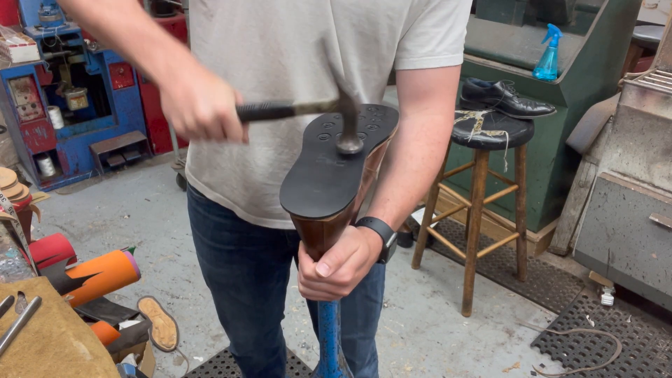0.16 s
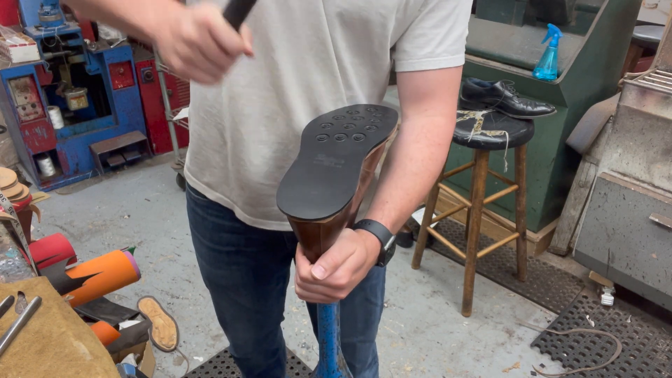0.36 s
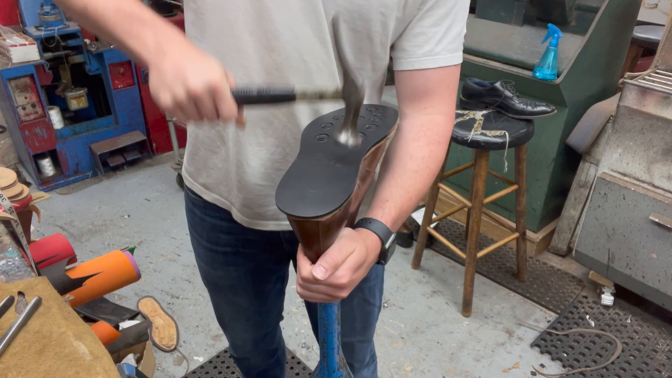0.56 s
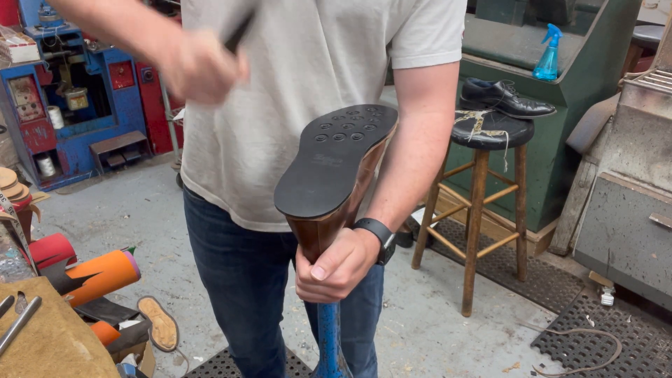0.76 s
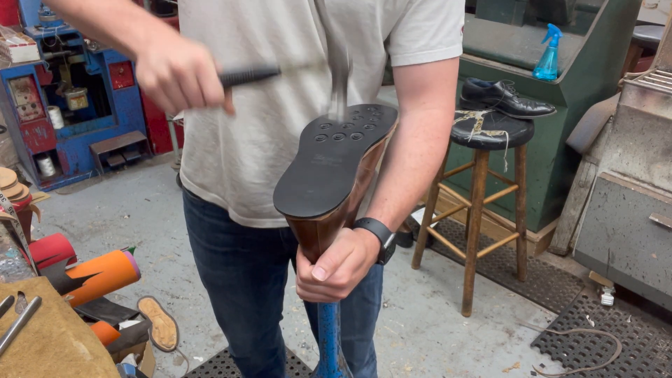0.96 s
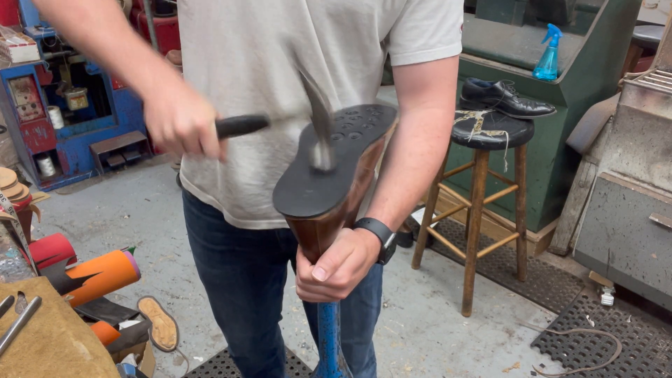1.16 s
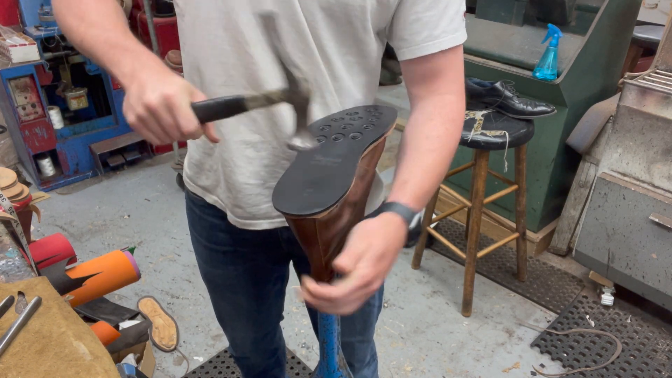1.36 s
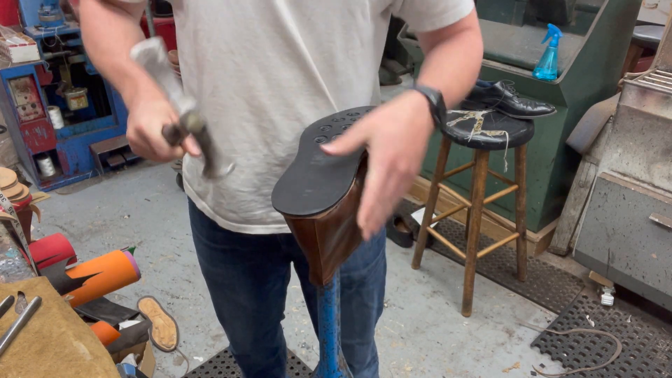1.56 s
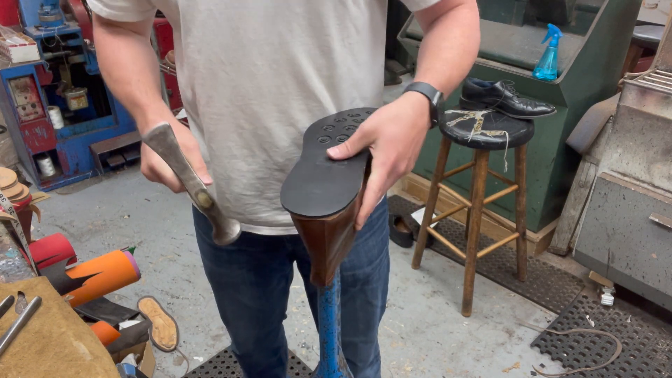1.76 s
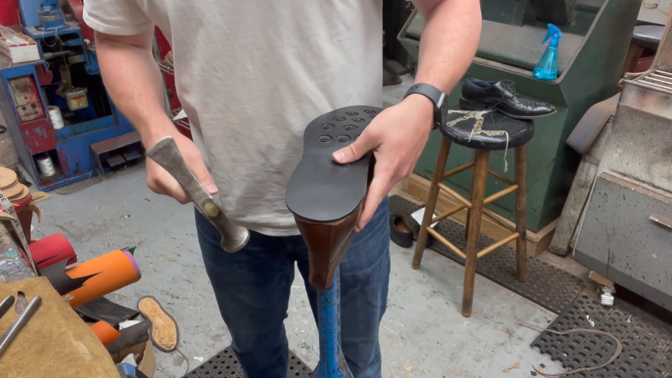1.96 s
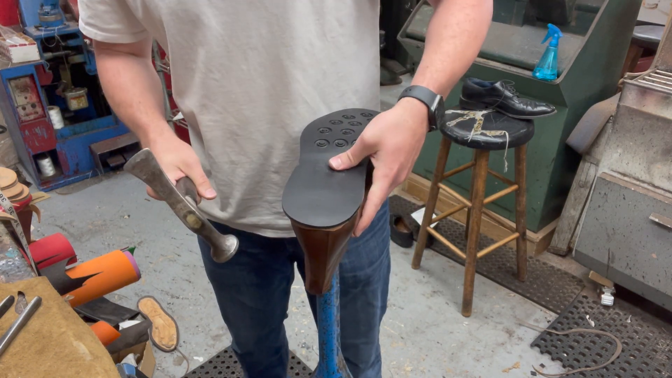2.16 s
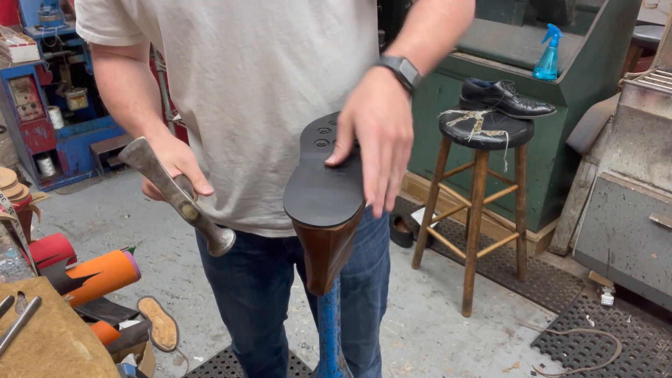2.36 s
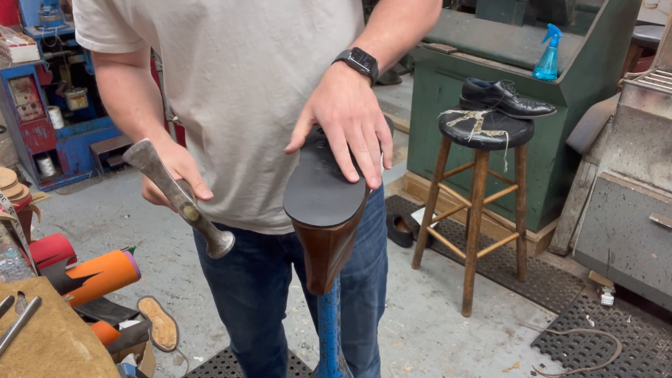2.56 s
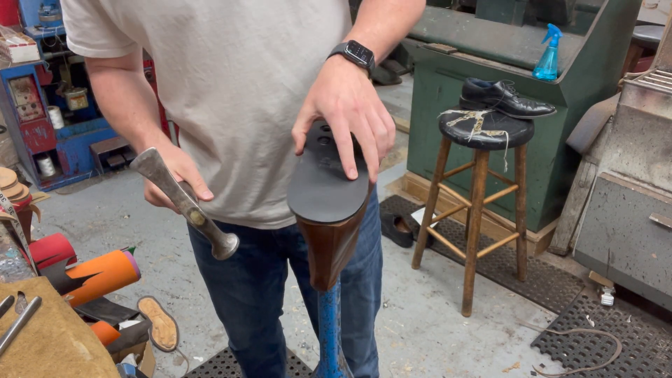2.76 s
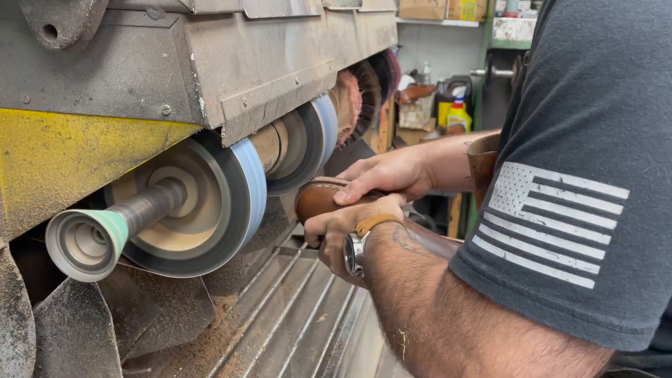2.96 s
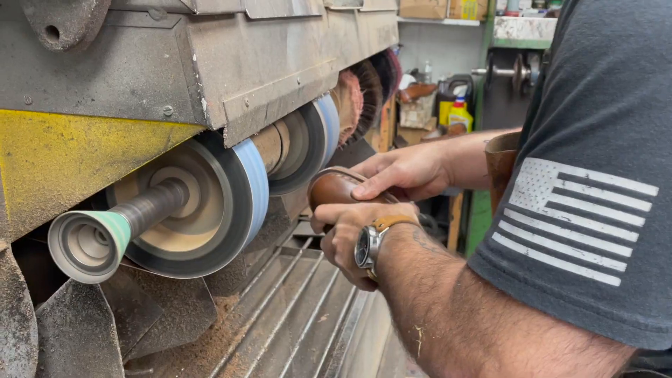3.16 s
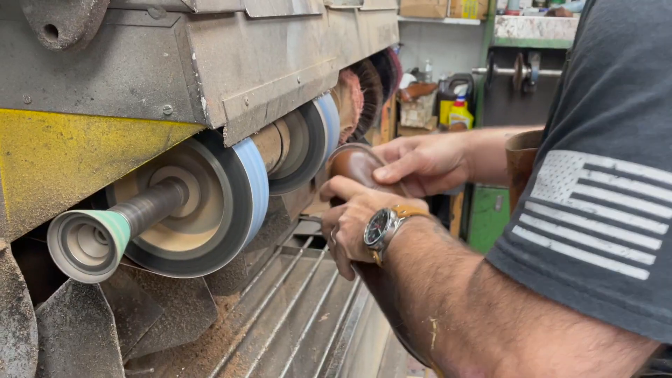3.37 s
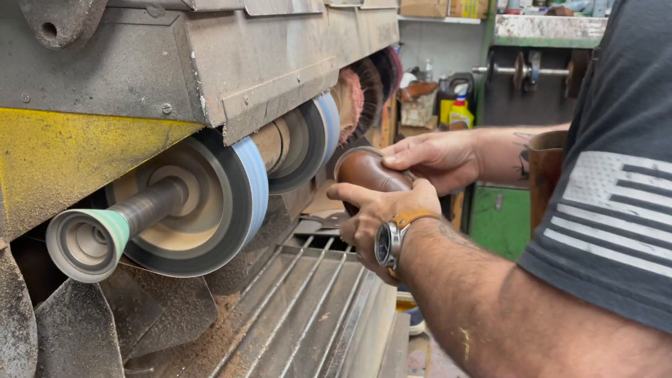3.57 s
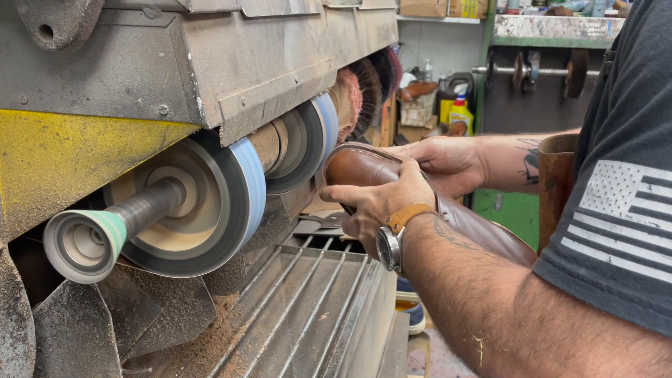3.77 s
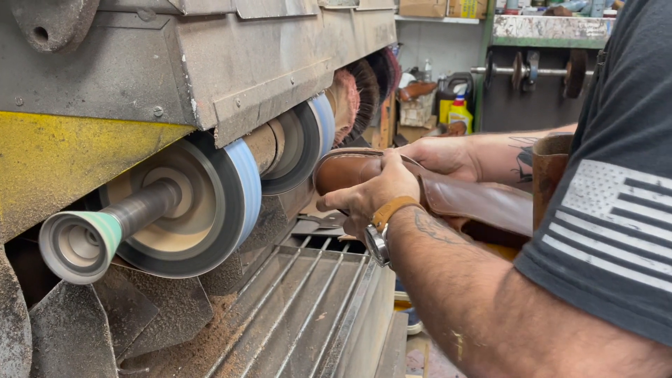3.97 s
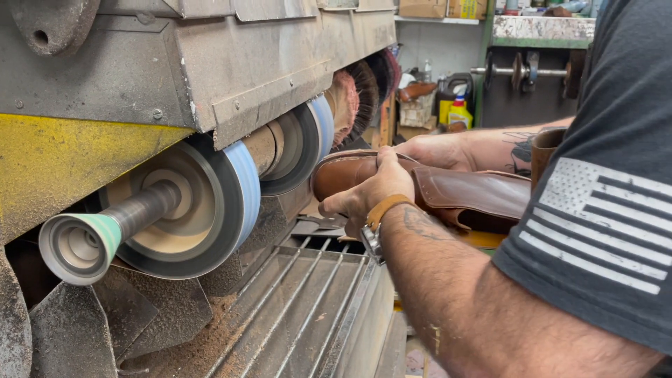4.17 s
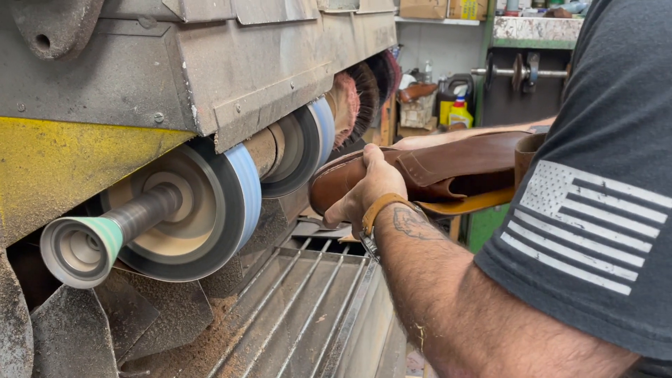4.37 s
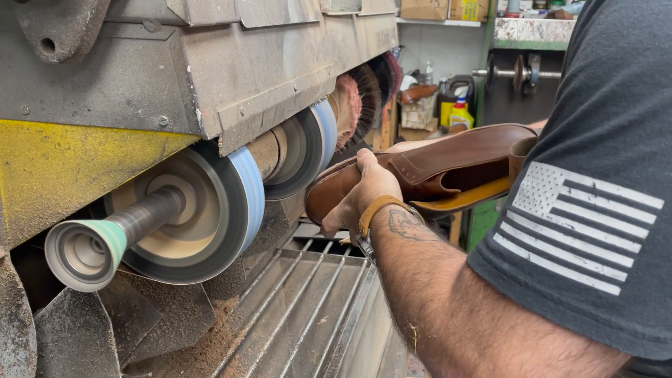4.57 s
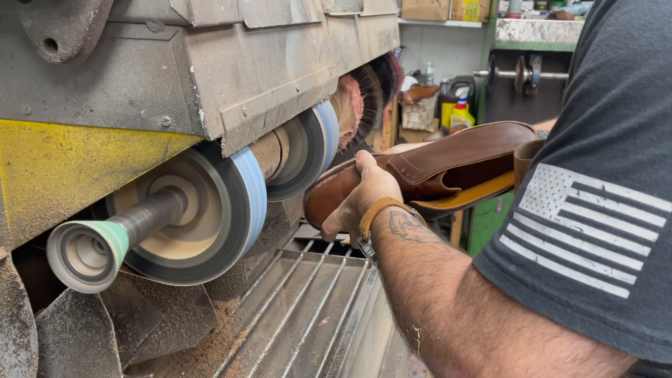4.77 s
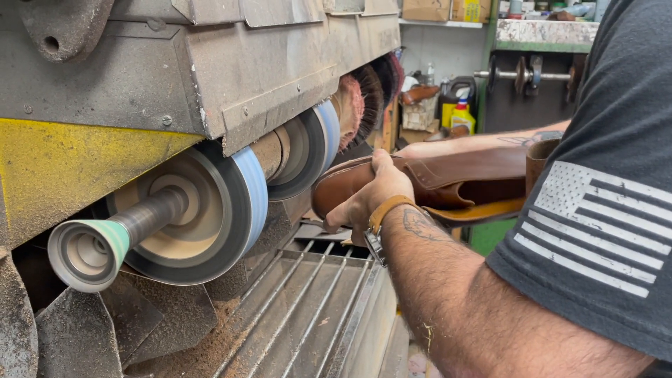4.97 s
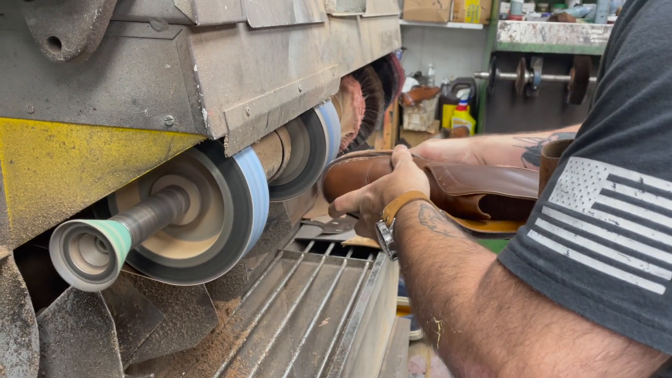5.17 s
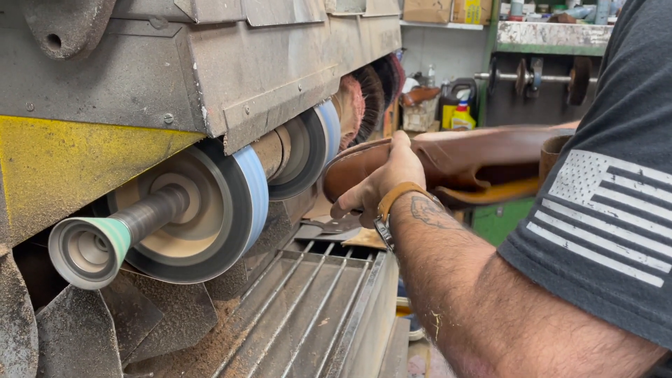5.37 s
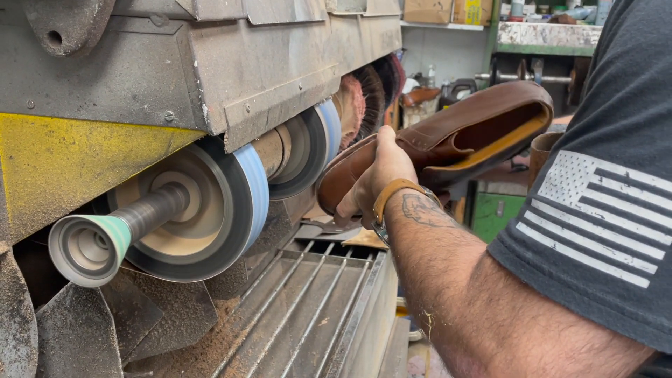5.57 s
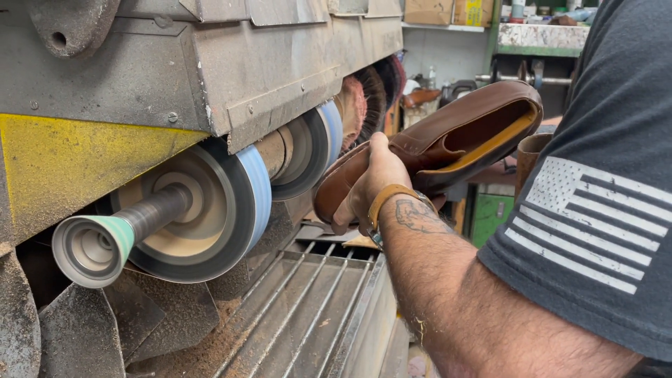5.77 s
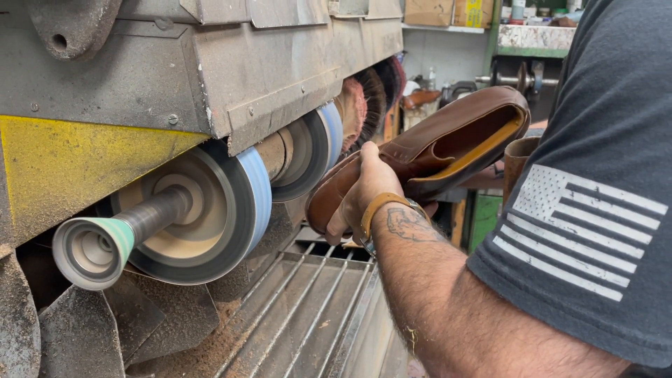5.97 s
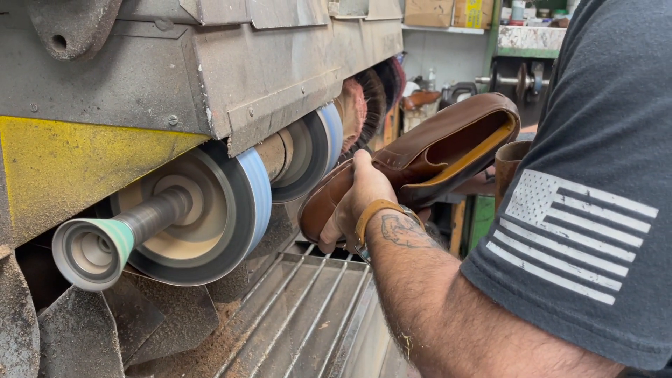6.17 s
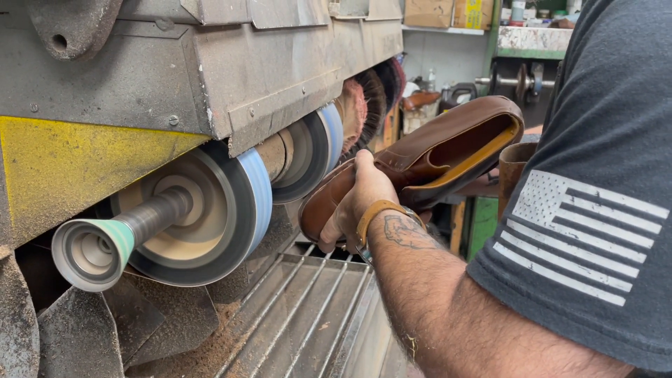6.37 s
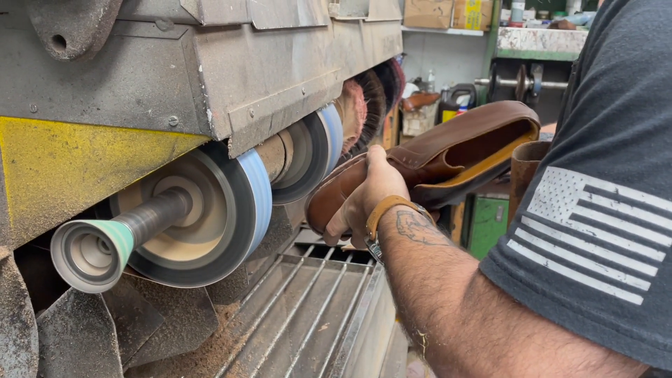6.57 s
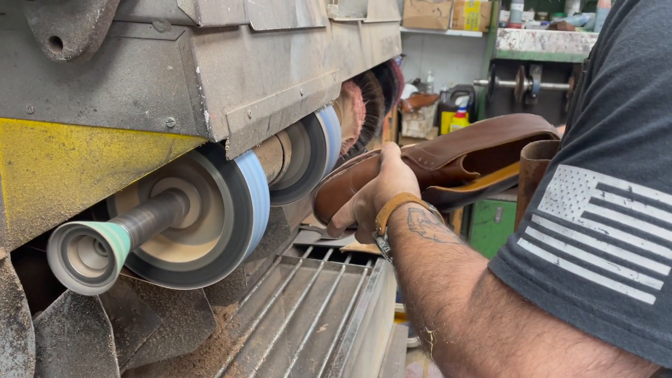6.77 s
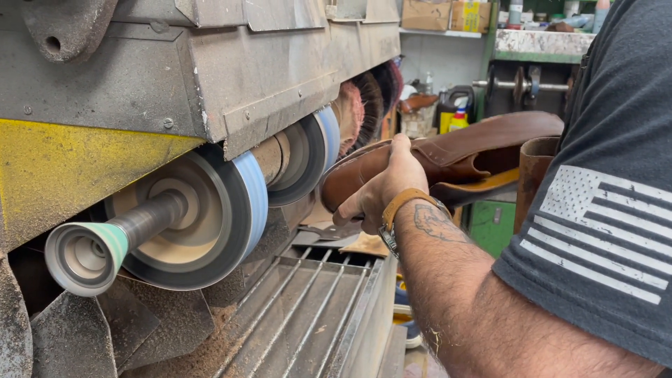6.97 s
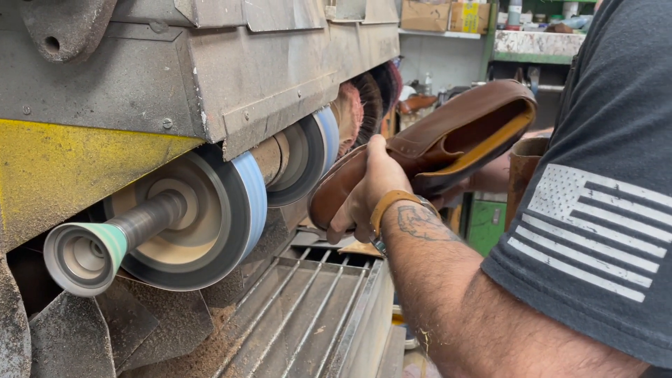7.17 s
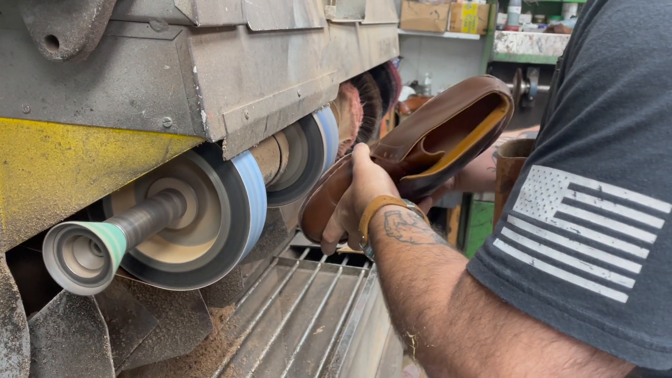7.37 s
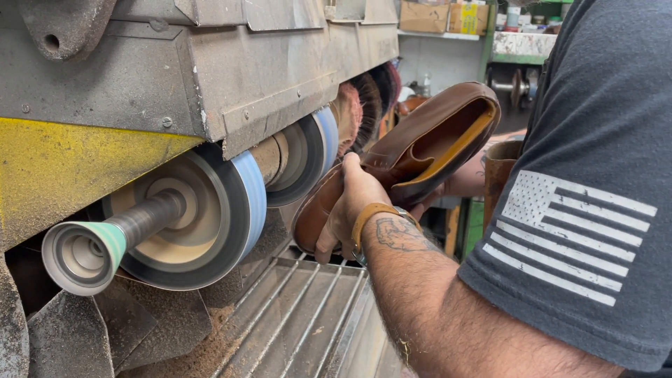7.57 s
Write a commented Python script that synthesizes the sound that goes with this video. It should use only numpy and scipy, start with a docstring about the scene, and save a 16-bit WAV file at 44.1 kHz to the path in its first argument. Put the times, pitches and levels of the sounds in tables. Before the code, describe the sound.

In a workshop, a hammer strikes a rubber boot sole on an iron stand four times, roughly three blows a second, each a tick and hollow knock with quick lighter bounces and a low floor thump. Soft hand rubs and pats follow over faint rumble. Then it cuts abruptly to a finishing machine heard close in stereo, humming and roaring while its brush hisses and scrubs leather in uneven swells.

```python
"""The last ring of a hammer blow, then four strikes on a rubber boot sole; the boot bounces on its iron last.
Ticks, knocks, boom and floor thump ring out in the shop; a hand then strokes the sole, with far rumble behind.
At 2.93 s the place becomes a finishing machine, heard close: sine tones hum and shaped noise roars.
A brush wheel hisses, scrubs and drums on the leather as the boot is pressed to it; narrow noise bands swell.
Both places are heard in stereo, with level and phase between the channels set by frequency."""
import sys
import numpy as np
from scipy import signal
from scipy.fft import rfft, irfft, next_fast_len
from scipy.io import wavfile
from scipy.ndimage import uniform_filter1d

SR = 44100
rng = np.random.default_rng(int(sys.argv[2]) if len(sys.argv) > 2 else 0)


def transcribe(u):
    """Save the signal u as a 16-bit wav file named by the first command-line argument.

    u: samples, shape (n,) or (channels, n), limited to [-1, 1]; the rate is SR.
    q: integer samples, one column per channel.
    """
    v = np.clip(np.atleast_2d(u).T, -1, 1)
    q = np.round(v * 32767).astype(np.int16)
    wavfile.write(sys.argv[1], SR, q)


N = 335584

# --- tables: levels are relative to the other stages of the same source ---
# far rumble of the quiet shop: f/Hz, density/dB per Hz
SHOP_RUMBLE = [(30, -88), (60, -82), (100, -89), (170, -106), (450, -114), (1000, -124), (3200, -131),
               (8500, -134), (16000, -141)]
# hand and cloth on the boot: t/s, rub level/dB, thud level/dB, rub time constant/s
TOUCHES = [(1.581, -57, -73, 0.02), (1.629, -63, -74, .03), (1.662, -69, -69, .02), (1.74, -63, -78, .03),
           (1.782, -67, -72, .015), (1.84, -67, -80, .04), (1.91, -70, -74, 0.027),
           (2.058, -56, -64, 0.0088), (2.087, -64, -76, .05), (2.15, -63, -73, .02), (2.184, -65, -74, .02),
           (2.246, -66, -72, 0.015), (2.599, -65, -74, 0.027), (2.633, -68, -75, .012),
           (2.74, -72, -78, 0.014), (2.838, -71, -75, .006), (2.888, -72, -80, 0.011),
           (2.921, -66.5, -76, .005)]
# colour of the rubbing: f/Hz, density/dB per Hz
TOUCH_COLOUR = [(100, -37), (240, -16), (340, 8.5), (440, -2), (600, -13), (1300, -22), (1900, -25),
                (2150, -16), (2400, -27), (6000, -30), (16000, -51)]
# mains hum, shaft orders, rotor slots, brush and boot tones: f/Hz, level/dB, waver rate/Hz, waver share/0-1
MACHINE_TONES = [(59.2, -38, 3, .4), (88.8, -34.5, 3, .5), (119.8, -30, 4, .3), (153, -44, 4, .6),
                 (183, -43, 4, .6), (214, -39, 4, .6), (239.6, -34.5, 4, .3), (658, -46, 4, .6),
                 (833.6, -46, 3, .5), (480, -46, 5, .6), (591, -43.5, 2, .5), (1036, -53, 2, .4),
                 (1065.5, -36.5, 6, .35), (1095.5, -47, 2, .5), (1184, -57, 3, .5)]
# shaft, belt and fan: f/Hz, density/dB per Hz
ROAR = [(30, -66), (55, -53.5), (100, -53.5), (240, -54.5), (290, -60.5), (420, -59.5), (550, -66.5),
        (720, -65), (940, -69), (1100, -66.5), (1400, -71.5), (2200, -78.5), (4500, -73), (8500, -80),
        (11500, -85.5), (16000, -101)]
# bristles on leather: f/Hz, density/dB per Hz
BRUSH = [(100, -38), (290, 1), (380, 10.5), (550, -4), (700, 8.5), (845, 2), (885, 2), (1100, -1),
         (1780, -9), (1940, -0.5), (2200, -6.5), (2600, -2), (3200, -3), (3700, -3), (4200, -5), (5400, -6),
         (5900, -6), (6500, -7), (8500, -9.5), (11600, -9.5), (15000, -7.5)]
# boot pressed on the brush: t/s, hiss level/dB, drumming above that hiss/dB,
# scrubbing above its share of the hiss swing/dB
BRUSH_WORK = [(2.95, -36, 0, 1), (3.3, -39.5, -0.5, 1.5), (3.36, -57, 14, 7), (3.82, -60, 15.5, 7),
              (3.95, -36, 0, 0), (4.22, -33.5, -3.5, -0.5), (4.41, -36, -1.5, 0.5), (4.7, -34.5, 0.5, 0),
              (4.8, -39, 0, 1), (4.94, -34, -5.5, 1), (5.22, -41, 0.5, -0.5), (5.7, -35.5, -3.5, 0),
              (6.27, -36.5, 2, 0.5), (6.32, -29.5, -6.5, -1), (6.92, -41.5, 2, 1.5), (7.1, -41, -2, 0),
              (7.3, -33.5, -4.5, -1.5), (7.61, -28.5, -8, -2)]
# short catches of the bristles on an edge: t/s, hiss rise/dB, scrubbing rise/dB
CATCHES = [(3.849, 15, 7), (4.975, 3, 2.5), (7.555, 0, 4.5), (7.58, -1, 8)]
# five noise bands that swell on their own, a machine hum near 240 Hz and four of the brushed boot:
# centre f/Hz, width/Hz, level/dB
SWELLING_BANDS = [(237.7, 11.3, -9), (522, 255, -11.5), (813, 65, -0.5), (1635, 910, -5.5),
                  (3730, 880, -4.5)]
# course of those bands, added to the band level: t/s, level/dB of each of the five bands
SWELLING_COURSE = [(2.95, -50, -49, -35, -35, -49), (3.27, -27, -39, -43, -31.5, -45),
                   (3.35, -43, -46, -51, -40, -50), (3.66, -28.5, -56, -50, -52, -47),
                   (3.7, -46, -50, -54, -51, -55), (3.79, -25, -47, -51, -50, -43),
                   (3.83, -37, -42, -52, -32, -44), (3.95, -17.5, -43, -40, -28, -42),
                   (4.19, -41, -20, -47, -34, -35), (4.22, -30, -24, -27.5, -42, -28.5),
                   (4.81, -25.5, -44, -40, -40, -48), (4.97, -29, -42, -31.5, -43, -25.5),
                   (5.16, -14.5, -32, -51, -37.5, -44), (5.38, -37, -28, -37.5, -37, -32),
                   (5.71, -19, -33, -33.5, -45, -40), (6.06, -25, -20, -29.5, -39, -31),
                   (6.6, -54, -22.5, -38, -31.5, -43), (6.8, -32, -30, -35, -35, -32),
                   (6.96, -45, -52, -61, -46, -41), (7.04, -30, -27, -40, -35, -44),
                   (7.43, -37, -17, -28.5, -32, -38), (7.6, -35, -22, -33, -30, -38)]
# hammer blows and rebounds on the last: t/s, strength/dB, tick level/dB, knock level/dB, floor thump level/dB,
# boom f/Hz, boom t60/s, knock f/Hz (before the knock's own pitch ratio)
BLOWS = [(-.29, -7, -7, -2.5, -28.5, 338, 0.057, 1050), (0.0736, -3.5, -14.5, -1, -18.5, 345, 0.067, 1105),
         (0.121, -17.5, -18, -10, -25, 361.3, 0.026, 1000), (0.152, -33, -30, -12.5, -19, 320, 0.041, 990),
         (0.4387, -2, -1.5, -3.5, -25, 345, 0.056, 1046),
         (0.485, -14.5, -18, -11.5, -17.5, 345, 0.06, 1000),
         (.534, -34, -30, -20, -11.5, 333.7, 0.058, 1000),
         (0.8087, -1.5, -16.5, -5.5, -22, 335, 0.041, 1014),
         (0.879, -17.5, -5, -11, -14.5, 333, 0.0577, 910), (1.153, -0.5, -11.5, -3.5, -28, 348, .045, 750),
         (1.204, -15.5, -11, -10, -26.5, 377, .035, 730)]
# rubber on the iron last: f/Hz, level/dB, t60/s
SOLE_MODES = [(537, -19, 0.059), (622, -19.5, 0.15), (714, -22.5, 0.13), (670, -4.5, 0.05),
              (750, -13.5, .07), (880, -29, .15), (920, -8.5, 0.055), (1450, -5, 0.015), (1345, -18, .06),
              (1930, -14, 0.03), (2050, -3, 0.025), (2450, -13.5, .04), (2670, -11.5, 0.036),
              (3500, -8.5, .03)]
# leather of the hollow boot, and the longer ring of the stand: f/Hz, level/dB, t60/s
BOOT_MODES = [(178, -30, .06), (262, -36, .3), (410, -28, .12), (295, -50, .5), (311, -50, .6),
              (320, -49, .75), (328, -48, .75), (341, -49, .6), (356, -49, .55), (377, -46, .5),
              (448, -38, .3), (495, -42, .25)]
# air modes of the boot: share of the boom pitch, level/dB
BOOM_PARTS = [(0.768, -20), (.93, -1), (1.08, 1), (1.268, -10), (1.452, -17.5)]
# floor under the stand: f/Hz, level/dB, t60/s
FLOOR_MODES = [(52.34, -7, 0.7), (60, -1.5, 0.6), (75.5, 0, 0.36), (78.8, -3, 0.74), (91.6, 2.5, 0.6),
               (147, -20.5, 0.66)]
# reverberation of a blow: f/Hz, density/dB per Hz, t60/s
SHOP_TAIL = [(59.8, -57, 0.93), (125, -63.5, 0.26), (210, -61.5, 0.25), (368, -50, 0.2), (660, -55.5, 0.15),
             (1500, -67, 0.15), (3370, -76.5, 0.15), (6000, -84.5, 0.17), (11500, -92.5, 0.28),
             (16000, -93, .12)]
# microphone ports facing the stand: f/Hz, likeness/0-1, right leads/rad, left minus right/dB
AT_STAND = [(100, .98, 0, 0), (280, .9, -.1, -6), (450, .76, -.4, 2), (1000, .5, 0, -4), (1500, .5, .2, -1),
            (3200, .4, 2.1, -3), (6000, .5, 3.9, 2), (7500, .85, 2.8, -2), (11500, .97, .3, 0),
            (15700, .83, -1.6, 3)]
# stereo image of the machine; in narrow treble bands near 8 and 14.5 kHz the channels sound in opposite phase:
# # f/Hz, likeness/0-1, right leads/rad, left minus right/dB
MACHINE_IMAGE = [(60, .96, -.2, 2), (170, .95, -.2, 3), (450, .8, -.3, 3), (1000, .7, -.4, 3),
                 (1700, .3, -.7, 1), (3200, .75, -.6, 2), (4500, .6, -.6, 2), (6500, .7, .4, 3),
                 (7600, .97, 2.9, 0), (8900, .97, 3.4, 0), (9600, .7, 4.9, 0), (11600, .9, 6.3, 0),
                 (13800, .7, 7.8, 0), (14500, .97, 9.4, 0)]

# --- settings ---
MACHINE_ON_S, MOVE_S = 2.933, 0.014
USUAL_HISS_DB, DENSITY_DB = -40, -26.5     # hiss at usual pressure; from level to level per Hz
SCRUB_FOLLOWS, SIZZLE_FOLLOWS, HUM_FOLLOWS = 0.66, 1, 0.13     # share of the dB swing of the hiss
BRUSH_TONES_FOLLOW = 3.3     # brush and boot tones between 450 and 900 Hz swell this many times more, in dB
LOAD_AVERAGE_S = 0.24     # the hum follows the pressure averaged over this span
CATCH_S = 0.01     # from the peak of a catch to 1/e of its dB rise
BRUSH_TURN_S = .0659
BRUSH_REPEATS, REPEAT_TOP_HZ = .6, 950     # share of the noise that returns next turn, fading above
KNOCK_DB, KNOCK_T60_S = -8.5, .035     # chief note of the sole, pitched by where the hammer lands
BOOT_MOUTH_HZ, BOOT_MOUTH_Q = 343, 5.0
LINGER_DB, LINGER_TIMES, LINGER_TOP_HZ = -20, 2.3, 2500     # far corners: level, longer by, fading above
TAIL_APART_DB = 7.5     # lift of the part of the echo that is opposed in the two channels
RUMBLE_CUT_HZ, CUTOFF_HZ = 56, 15850     # band kept by the microphone


def amp(db):
    """Amplitude ratio of a level in dB."""
    return 10 ** (np.asarray(db) / 20)


def in_time(rows):
    """Every column of a table, drawn over the running time."""
    s, *columns = np.transpose(rows)
    return [np.interp(np.arange(N) / SR, s, c) for c in columns]


def at_hz(rows, hz):
    """Every column of a table over log frequency."""
    f, *columns = np.transpose(rows)
    return [np.interp(np.log(hz + 1), np.log(f), c) for c in columns]


def drift(rate_hz):
    """Slow chance with spread 1: noise through two equal low-pass poles, made at every 40th sample."""
    r = np.exp(-80 * np.pi * rate_hz / SR)
    noise = rng.standard_normal(N // 40 + 2002)
    slow = signal.lfilter([1], [1, -2 * r, r * r], noise)[2000:]     # skip the run-in
    return np.interp(np.arange(N) / 40, np.arange(len(slow)), slow / slow.std())


def white(size, repeats):
    """Two spectra of unit noise; a share of the low end returns with every turn of the brush."""
    hz = np.arange(size // 2 + 1) * SR / size
    back = np.clip(repeats, 0, .9) / (1 + (hz / REPEAT_TOP_HZ) ** 4)
    turn = np.exp(-2j * np.pi * hz * BRUSH_TURN_S)
    return rfft(rng.standard_normal((2, size))) * np.sqrt(1 - back ** 2) / (1 - back * turn)


def coloured(spectrum, gain_db_of_band, repeats=0):
    """Two unrelated noises of a given density, in third-octave bands that each follow a gain of their own."""
    size = next_fast_len(N)
    hz = np.arange(size // 2 + 1) * SR / size
    shaped = white(size, repeats) * amp(at_hz(spectrum, hz)[0]) * np.sqrt(SR / 2)
    out, octave = np.zeros((2, N)), np.log2(hz + 1)
    for centre in np.arange(5.5, 14.4, 1 / 3):
        share = np.clip(1 - 3 * abs(np.maximum(octave, 5.5) - centre), 0, 1)
        out += irfft(shaped * share, size)[:, :N] * amp(gain_db_of_band(2 ** centre))
    return out


def ring(clicks, modes, spread_db):
    """Damped resonators: every click strikes every mode with a strength of its own."""
    out, at = np.zeros(N), np.flatnonzero(clicks)
    for hz, level_db, t60 in modes:
        r, w = amp(-60 / (t60 * SR)), 2 * np.pi * hz / SR
        force = np.full(N, 1e-18)     # keeps the filter out of denormal numbers
        force[at] = clicks[at] * amp(level_db + spread_db * rng.standard_normal(len(at)))
        out += signal.lfilter([0, np.sin(w)], [1, -2 * r * np.cos(w), r * r], force)
    return out


def burst(clicks, t60, low_hz, high_hz):
    """Band-passed noise that starts at each click and dies exponentially."""
    shape = signal.lfilter([1], [1, -amp(-60 / (t60 * SR))], clicks + 1e-18)
    band = signal.butter(2, [low_hz, high_hz], "band", fs=SR, output="sos")
    return signal.sosfilt(band, shape * rng.standard_normal(N))


def soft_contact(x, late_s, long_s):
    """A soft, late contact: delayed and smoothed."""
    push = signal.windows.hann(int(long_s * SR))
    return np.convolve(np.roll(x, int(late_s * SR)), push / push.sum())[:N]


def boom_of(s, level_db, hz, t60, parts=BOOM_PARTS):
    """Each blow starts decaying sine partials at a pitch and damping of its own."""
    out, t = np.zeros(N), np.arange(SR // 4) / SR
    for start, db, pitch_hz, ring_s in zip(s, level_db, hz, t60):
        at = round(start * SR)
        note = sum(amp(part_db) * np.sin(2 * np.pi * share * pitch_hz * t) for share, part_db in parts)
        out[at:at + len(t)] += amp(db - 60 * t / ring_s) * note
    return out


def stereo_image(shared, apart, table):
    """Two channels: a common part and an opposed part, with phase lead and balance by frequency."""
    size = next_fast_len(N + 4096)
    alike, lead, pan_db = at_hz(table, np.arange(size // 2 + 1) * SR / size)
    alike = np.clip(alike, 0, 1)
    common = np.sqrt((1 + alike) / 2) * rfft(shared, size)
    opposed = np.sqrt((1 - alike) / 2) * rfft(apart, size)
    left = (common + opposed) * amp(pan_db / 2) * np.exp(-.5j * lead)
    right = (common - opposed) * amp(-pan_db / 2) * np.exp(.5j * lead)
    return irfft([left, right], size)[:, :N]


def far_rumble():
    """Noise from far off in the shop; its bands waver singly and swell together."""
    swell = drift(5)
    return coloured(SHOP_RUMBLE, lambda hz: 2.0 * drift(3.7) + 1.4 * swell)


def touches():
    """A hand rubs the sole in brief swells of noise, and each touch sets the boot thudding."""
    t, stroke, pats = np.arange(N) / SR, np.zeros(N), np.zeros(N)
    for s, rub_db, thud_db, rub_s in TOUCHES:
        since = np.maximum(t - s, 0) / rub_s
        stroke += amp(rub_db) * np.sqrt(since) * np.exp(-since)
        pats[round(s * SR)] = amp(thud_db)
    rub = stroke * coloured(TOUCH_COLOUR, lambda hz: -30.0 + 1.9 * drift(40))
    booms = boom_of(*np.transpose([(s, db - 8, 345, .06) for s, _, db, _ in TOUCHES]))
    return rub, booms + amp(3.0) * burst(pats, .012, 500, 2500)


def quiet_shop():
    """The microphone at the stand hears far rumble and soft touches."""
    rub, thuds = touches()
    shared, apart = far_rumble() + rub
    return stereo_image(shared + thuds, apart, AT_STAND)


def machine_roar():
    """Shaft, belt and fan: shaped noise whose bands waver."""
    return coloured(ROAR, lambda hz: 1.6 * drift(5))


def machine_tones(swing_db):
    """Sines with wavering strength and phase; those below 900 Hz swell with the load."""
    t, out = np.arange(N) / SR, np.zeros(N)
    load_db = HUM_FOLLOWS * uniform_filter1d(swing_db, int(LOAD_AVERAGE_S * SR))
    for hz, db, rate_hz, share in MACHINE_TONES:
        follows = (hz < 900) * (BRUSH_TONES_FOLLOW if hz > 450 else 1)
        in_phase = (1 + share * drift(rate_hz)) * np.sin(2 * np.pi * hz * t)
        quadrature = share * drift(rate_hz) * np.cos(2 * np.pi * hz * t)
        out += amp(db + follows * load_db) * (in_phase + quadrature)
    return out


def swelling_bands():
    """Machine hum near 240 Hz and four bands of the brushed boot: noise twice through each resonance."""
    out = np.zeros((2, N))
    for (hz, width_hz, db), level_db in zip(SWELLING_BANDS, in_time(SWELLING_COURSE)):
        peak = signal.iirpeak(hz, hz / width_hz, fs=SR)
        noise = irfft(white(next_fast_len(N), BRUSH_REPEATS))[:, :N]
        tone = signal.lfilter(*peak, signal.lfilter(*peak, noise))
        out += amp(db + level_db) * tone / tone.std()
    return out


def brush(swing_db, drum_db, scrub_db):
    """Bristles on leather: drumming, scrubbing, hiss and sizzle, from low bands to high, follow the pressure."""
    t = np.arange(N) / SR
    catch_db, scrape_db = sum(np.outer(rise_db, np.exp(-((t - s) / CATCH_S) ** 2))
                              for s, *rise_db in CATCHES)
    flutter = drift(23)     # uneven bristles pass the leather
    parts_db = [swing_db + drum_db,
                SCRUB_FOLLOWS * swing_db + scrub_db + scrape_db,
                swing_db + catch_db,
                SIZZLE_FOLLOWS * swing_db + catch_db]
    # f/Hz, then shares of drumming, scrubbing, hiss and sizzle
    part_shares = [(900, 1, 0, 0, 0), (2000, 0, 1, 0, 0), (6000, 0, 1, 0, 0),
                   (10000, 0, 0, 1, 0), (12000, 0, 0, 1, 0), (16000, 0, 0, 0, 1)]

    def brush_db(hz):
        mix_db = sum(share * part_db for share, part_db in zip(at_hz(part_shares, hz), parts_db))
        level_db = USUAL_HISS_DB + DENSITY_DB + mix_db
        return level_db + 1.04 * flutter + 0.6 * drift(3.6) + 1.0 * drift(17.6)

    return coloured(BRUSH, brush_db, BRUSH_REPEATS)


def machine():
    """Close to the machine: roar, tones, swelling bands, and the brush at work on the boot."""
    hiss_db, drum_db, scrub_db = in_time(BRUSH_WORK)
    swing_db = hiss_db - USUAL_HISS_DB
    tones = machine_tones(swing_db)
    shared, apart = machine_roar() + brush(swing_db, drum_db, scrub_db) + swelling_bands()
    return stereo_image(shared + tones, apart + 0.42 * np.roll(tones, 900), MACHINE_IMAGE)


def shop_echo(force):
    """Energy builds over a few cycles, then dies at the pace of the band, unevenly, with a weak afterglow."""

    def echo_db(hz):
        die = amp(-120 / (at_hz(SHOP_TAIL, hz)[1] * SR))     # per sample, in energy
        build = np.exp(-1 / ((0.0041 + 2.0 / hz) * SR))
        poles = np.convolve([1, -die], [1, -build])
        energy = signal.lfilter([1 - build], poles, force ** 2 + 1e-18)
        late = signal.lfilter([1 - die], [1, -die ** (1 / LINGER_TIMES)], energy)
        late *= amp(2 * LINGER_DB + 4.5 * drift(18)) / (1 + (hz / LINGER_TOP_HZ) ** 2)
        return 10 * np.log10(energy + late + 1e-18) + 3.8 * drift(33)

    return coloured([row[:2] for row in SHOP_TAIL], echo_db)


def hammering():
    """Steel ticks on rubber and the sole knocks; the hollow boot booms just after and the stand shakes the floor."""
    s, strength_db, tick_db, knock_db, thump_db, boom_hz, boom_s, knock_hz = np.transpose(BLOWS)
    lead = SR // 2      # room for a blow that fell before the start
    start_s = s + lead / SR
    force = np.zeros((4, N))
    at = lead + np.round(s * SR).astype(int)
    force[:, at] = amp(strength_db + np.array([tick_db, knock_db, 0 * s, thump_db]))
    tick_force, knock_force, boom_force, thump_force = force

    tick = burst(tick_force, 0.0024, 2800, 18000)

    note = boom_of(start_s, strength_db + knock_db + KNOCK_DB, knock_hz, KNOCK_T60_S + 0 * s,
                   parts=[(0.98, 0.00079)])     # pitch ratio, level/dB
    sole = note + amp(-13.0) * ring(knock_force, SOLE_MODES, spread_db=5.0)
    knock = soft_contact(sole, late_s=0.0011, long_s=.0002)
    knock = knock + amp(-4.0) * burst(knock_force, 0.042, 740, 6000)

    hollow = boom_of(start_s, strength_db, boom_hz, boom_s) + ring(boom_force, BOOT_MODES, spread_db=8.5)
    boom = soft_contact(hollow, late_s=0.002, long_s=0.00086)
    # the air column takes a cycle to swing up
    boom = signal.lfilter(*signal.iirpeak(BOOT_MOUTH_HZ, BOOT_MOUTH_Q, fs=SR), boom)

    thump = soft_contact(ring(thump_force, FLOOR_MODES, spread_db=5.0), late_s=0.019, long_s=0.017)

    echo = shop_echo(knock_force + boom_force)
    shared = tick + knock + boom + thump + echo[0]
    heard = stereo_image(shared, amp(TAIL_APART_DB) * echo[1], AT_STAND)
    return np.pad(heard[:, lead:], [(0, 0), (0, lead)])


def scene():
    """The scene changes from the stand to the machine within a few milliseconds."""
    near = np.clip((np.arange(N) / SR - MACHINE_ON_S) / MOVE_S, 0, 1) ** 2
    return (1 - near) * (quiet_shop() + hammering()) + near * machine()


def record(dry):
    """The microphone drops the deepest bass, peaks are rounded, the top is cut."""
    low_cut = signal.butter(3, RUMBLE_CUT_HZ, "high", fs=SR, output="sos")
    thinned = signal.sosfilt(low_cut, dry)
    rounded = .7 * np.tanh(thinned / .7)
    top_cut = signal.ellip(12, .5, 95, CUTOFF_HZ, fs=SR, output="sos")
    return signal.sosfilt(top_cut, rounded)


dry = scene()
out = record(dry)
transcribe(out)
```